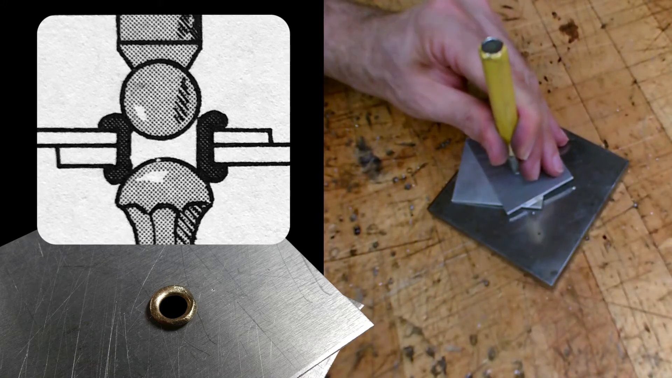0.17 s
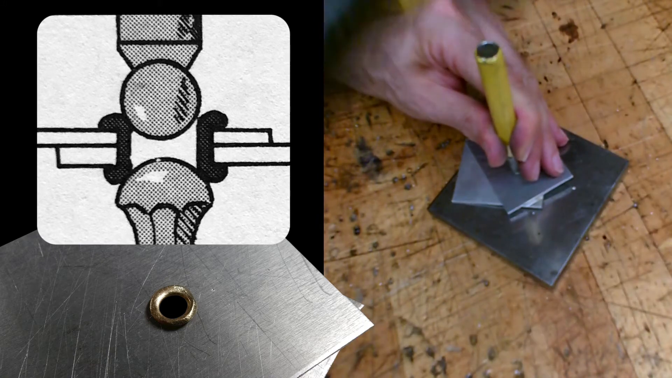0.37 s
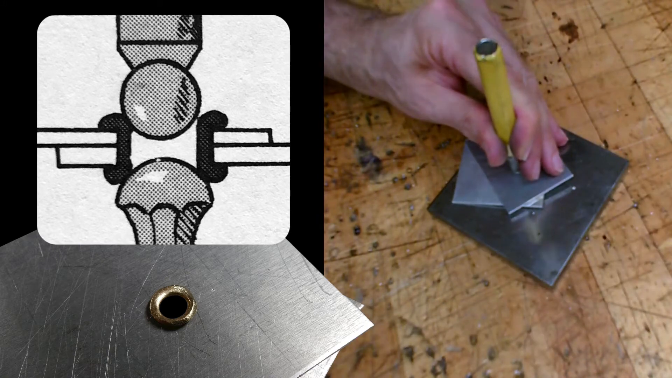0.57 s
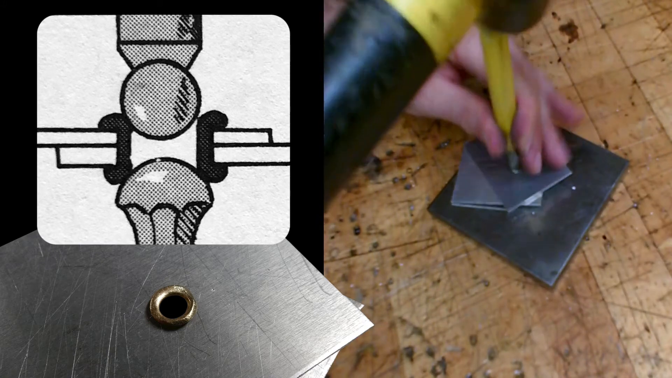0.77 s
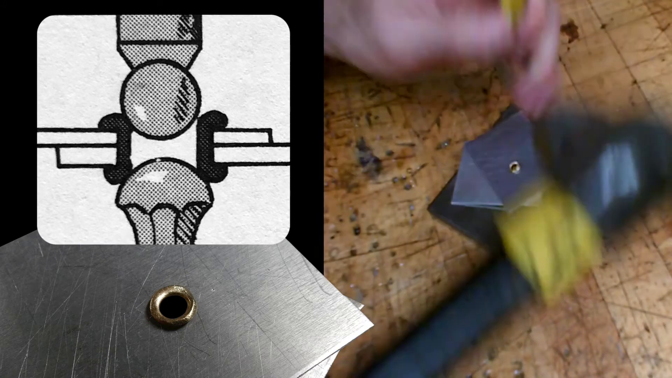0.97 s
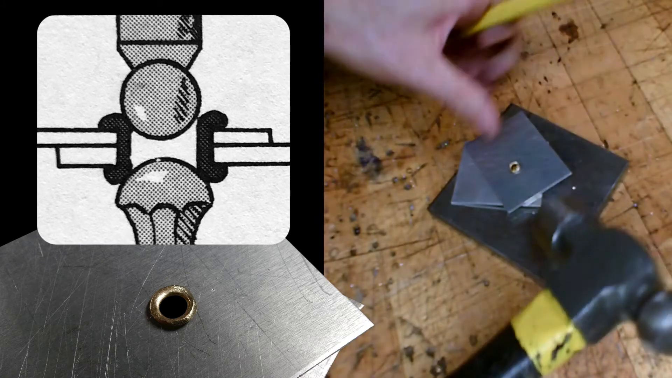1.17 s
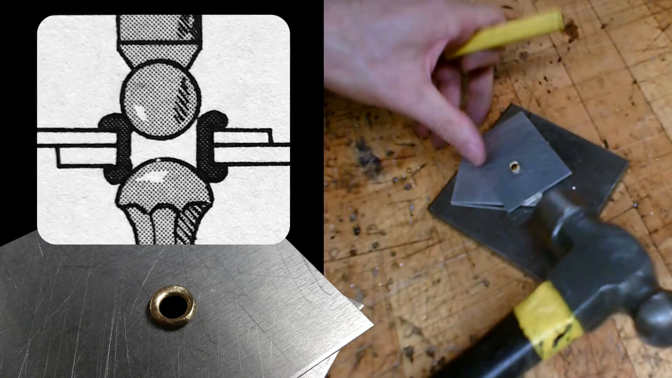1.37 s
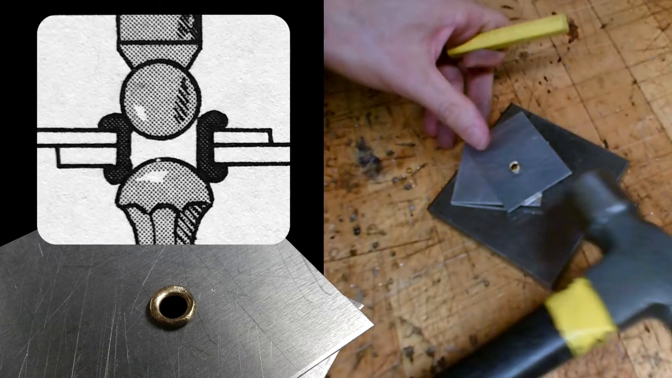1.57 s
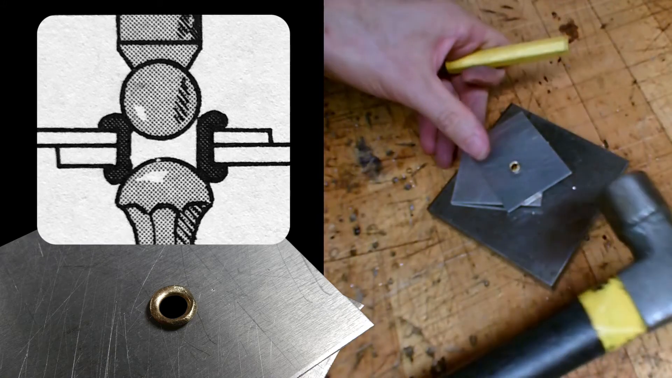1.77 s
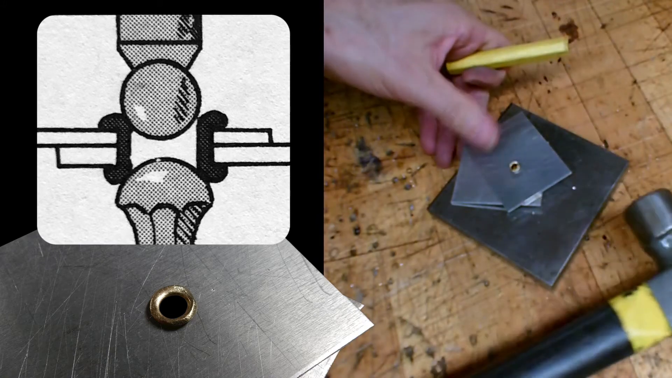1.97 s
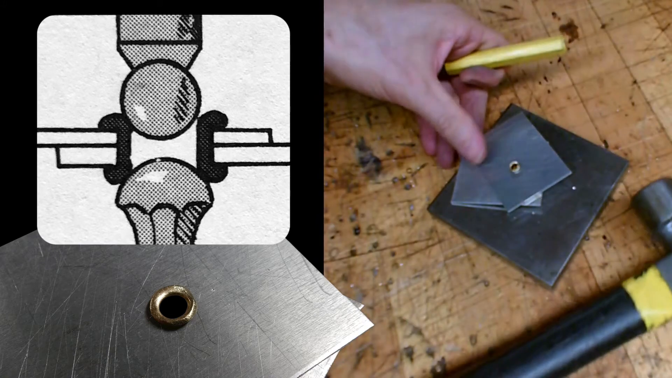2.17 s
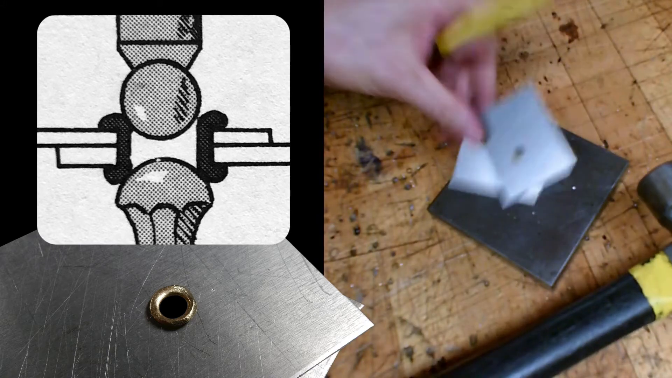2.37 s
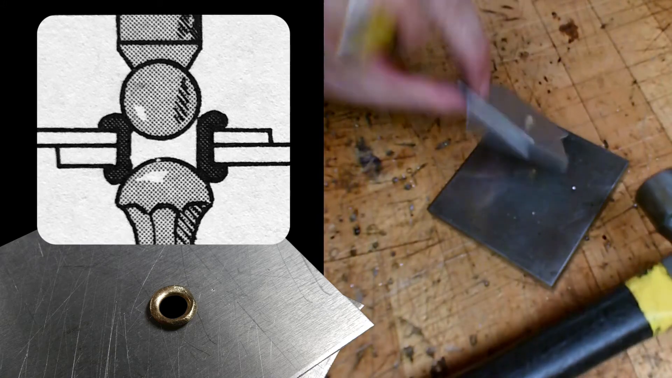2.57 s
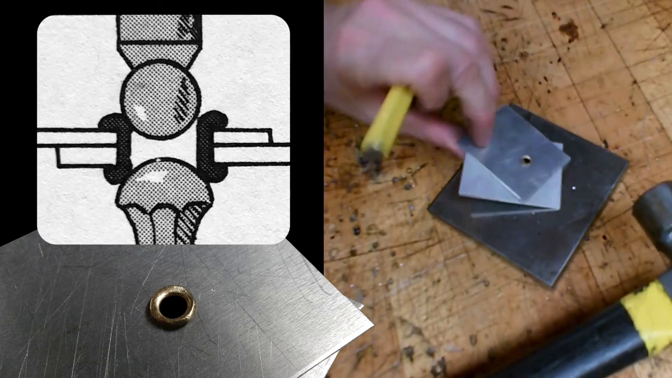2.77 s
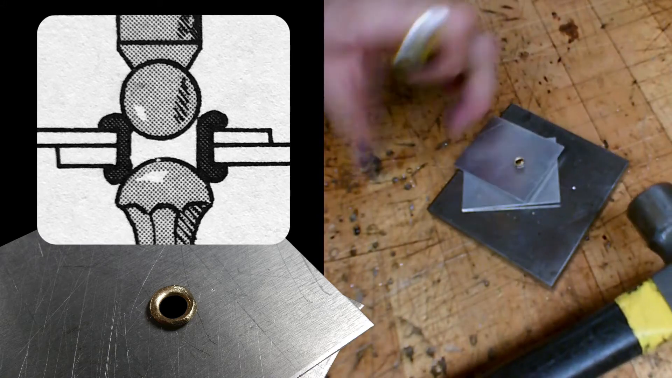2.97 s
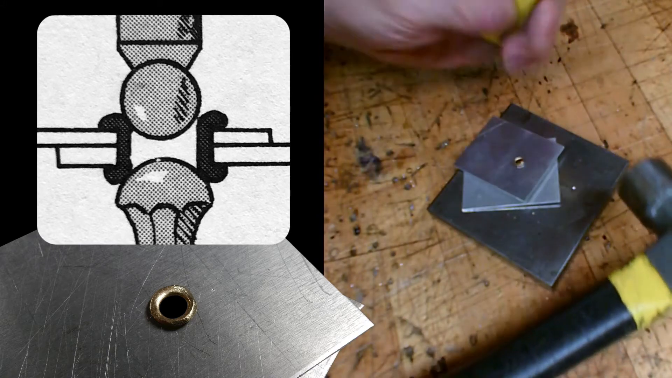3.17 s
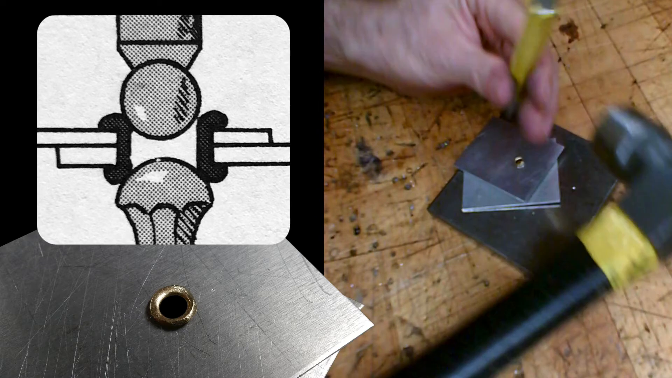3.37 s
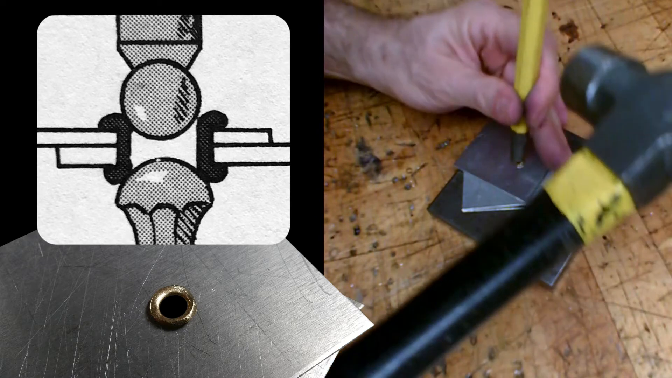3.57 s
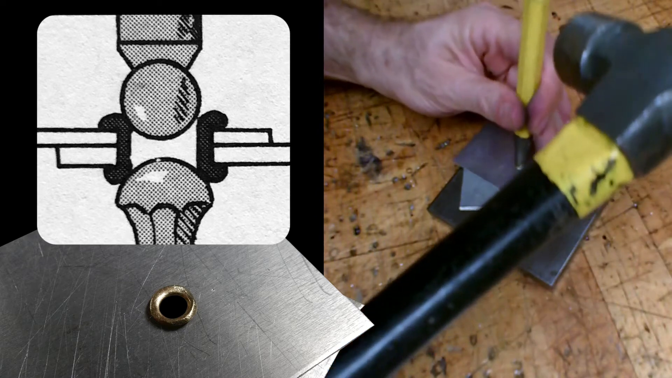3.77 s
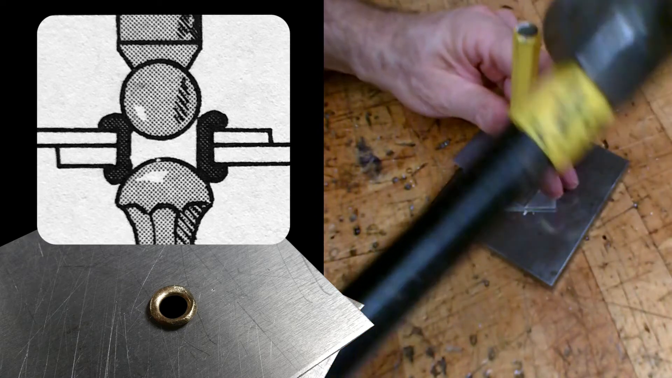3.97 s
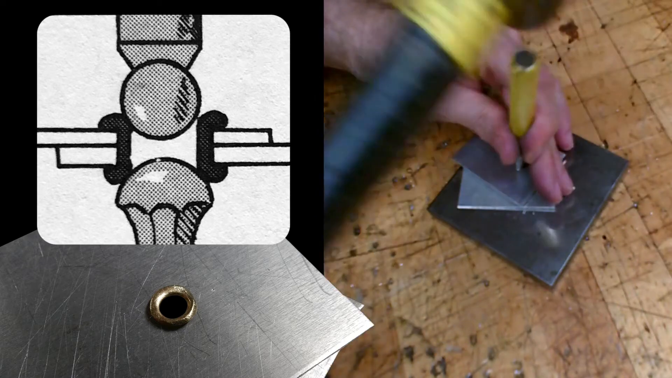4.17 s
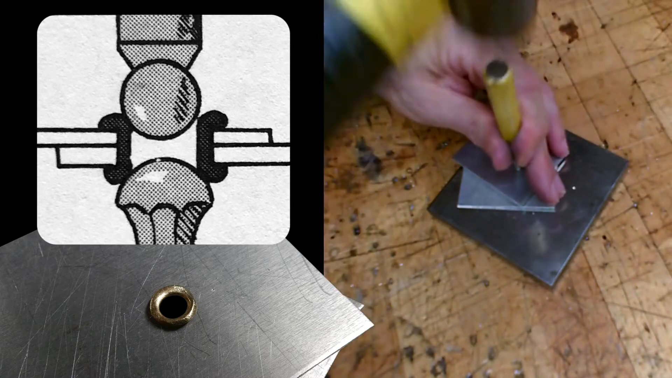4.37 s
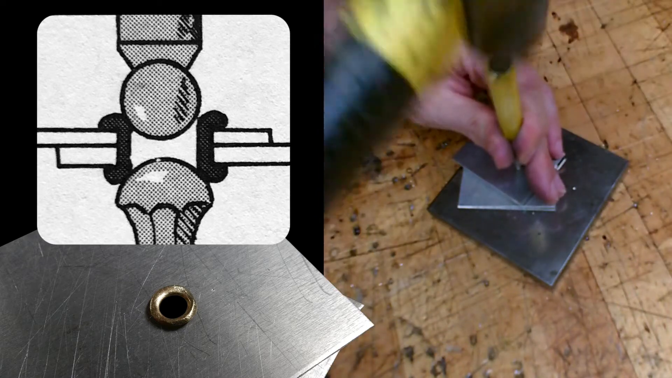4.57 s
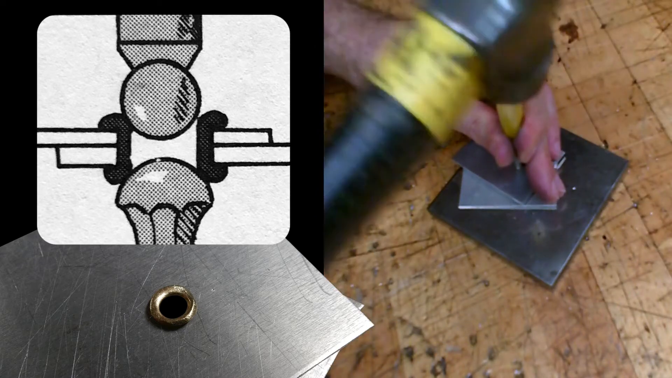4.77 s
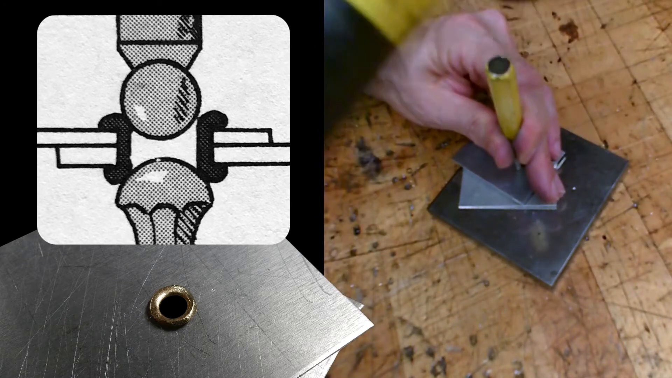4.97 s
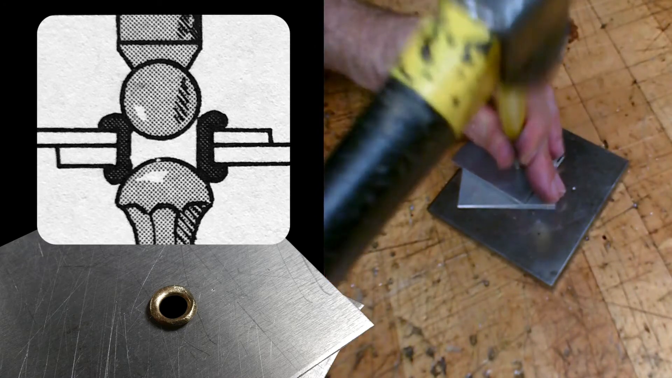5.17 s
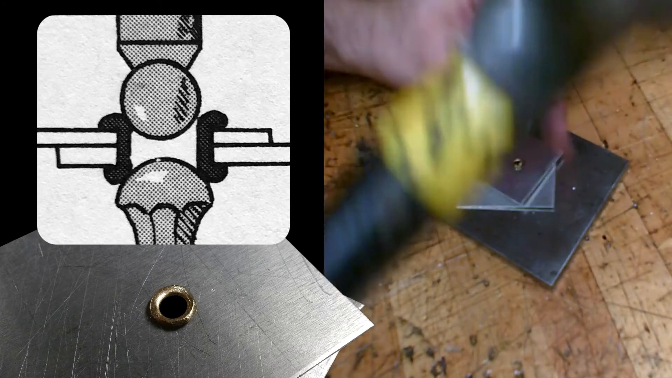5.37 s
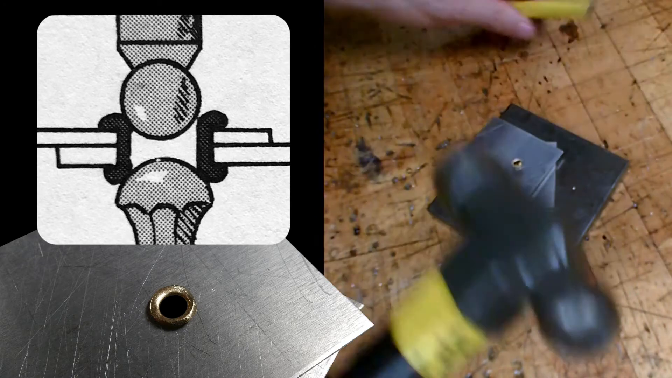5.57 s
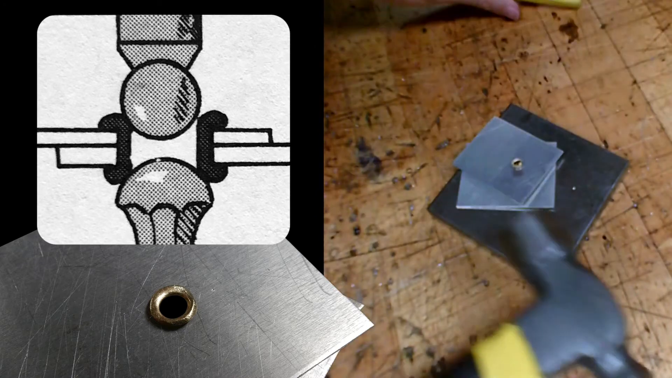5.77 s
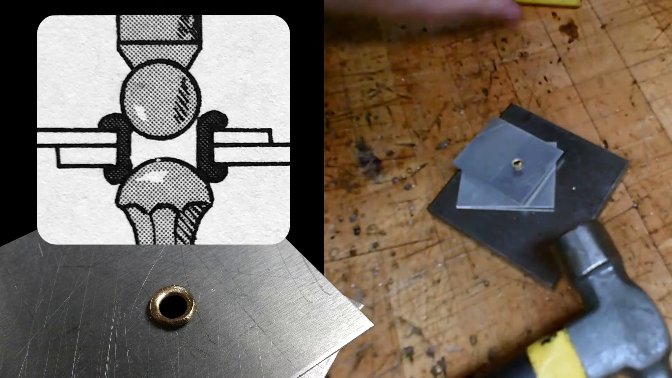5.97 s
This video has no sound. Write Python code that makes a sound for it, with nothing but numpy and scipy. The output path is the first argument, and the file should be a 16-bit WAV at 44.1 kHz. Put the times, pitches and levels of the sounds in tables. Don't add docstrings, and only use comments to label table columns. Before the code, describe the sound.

Hammer blows crack on a steel punch over thin metal plates in a live workshop, plates rattling and clinking, then the hammer set down.

```python
import sys
import numpy as np
from scipy import signal
from scipy.fft import rfft, irfft
from scipy.io import wavfile
from scipy.ndimage import uniform_filter1d

SR = 44100
rng = np.random.default_rng(int(sys.argv[2]) if len(sys.argv) > 2 else 0)


def digitize_waveform(pressure):
    field = np.atleast_2d(pressure).T
    bounded = np.clip(field, -1, 1)
    quanta = np.round(bounded * 32767).astype(np.int16)
    wavfile.write(sys.argv[1], SR, quanta)


def invert_db(x):
    u = np.asarray(x, float) / 20
    return 10 ** u


N = 265702

# pitch_hz, level_db, t60_s
TIP_MODES = [(3400, -0.5, 0.14), (3630, 9, 0.093), (4200, 4.5, 0.13), (4900, 5, 0.055), (6000, -4.5, 0.17),
             (7330, 3.5, 0.067), (7920, 10.5, 0.046), (10000, 0, 0.065), (11500, 3, 0.073),
             (12800, -2, 0.08), (13700, -16.5, .02)]


def evened(x):
    return x / np.sqrt(np.mean(x ** 2) + 1e-20)


def read(points, hz):
    f, value = np.transpose(points)
    return np.interp(np.log(hz + 1), np.log(f + 1), value)


def add(mix, s, sound):
    at = round(s * SR)
    sound = sound[max(-at, 0):]
    part = mix[max(at, 0):][:len(sound)]
    part += sound[:len(part)]


def returned(sound, returns):
    out = np.zeros(SR)
    for s, db in returns:
        add(out, s, invert_db(db) * sound)
    return out


def coloured(points, size):
    hz = np.fft.rfftfreq(size, 1 / SR)
    return evened(irfft(rfft(rng.standard_normal(size)) * invert_db(read(points, hz)), size))


def resonate(x, hz, width):
    turn = np.exp(2j * np.pi * np.cumsum(hz * np.ones(len(x))) / SR)
    r = np.exp(-np.pi * width / SR)
    return 2 * (turn * signal.lfilter([(1 - r) ** 2], [1, -2 * r, r * r], x / turn)).real


def ring(modes, length, detune=.0, scatter_db=.0, free=1.0, count=1):
    t = np.arange(round(length * SR)) / SR
    hz, db, t60 = np.repeat(np.transpose(modes), count, 1)[:, :, None]
    a, b, c = rng.uniform(-0.99, 1, (len(hz), 3)).T[:, :, None]
    fall = invert_db(db + scatter_db * b - 60 * t / (t60 * free))
    return (fall * np.sin(2 * np.pi * hz * (1 + detune * a) * t + 2.0 * c)).sum(0) / np.sqrt(count)


def padded(sound):
    return np.pad(sound, (0, SR - len(sound)))


def hammer_blows():
    # start_s, peak_db, bench_thud_db, steel_crack_db, punch_ring_db
    blows = [
        (0.216, 1, 4, -5, -14.5),
        (0.569, 3, 3, -3, -7.5),
        (4.4186, -9.5, 5.5, -6, -15.5),
        (4.737, -4, 8.5, -3, -5),
        (5.05, 0.5, 5, -5, -1.5),
    ]
    # peak_db, bench_thud_db, steel_crack_db, punch_ring_db
    earlier = (-3.5, 4.5, -7.5, -13)
    # pitch_hz, width_hz, level_db
    cracks = [
        [(3680, 330, -0.5), (4500, 340, -11), (6400, 210, -18), (7400, 210, -19), (8470, 250, -6),
         (9700, 190, -11.5), (9860, 160, -19.5), (11600, 400, -18.5)],
        [(2900, 210, -12), (3584, 190, 0.5), (4460, 200, -9), (5217, 620, -1.5), (7650, 240, -15),
         (9100, 230, -5), (10160, 400, -11), (11270, 440, -17.5)],
        [(3175, 500, 3), (3890, 190, 3), (4340, 160, -2), (6400, 410, -23), (7420, 410, -31),
         (8190, 250, -13.5), (9240, 260, 3.5), (11500, 440, -13.5)],
        [(3500, 400, -6), (3794, 250, -6.5), (4357, 420, -2.5), (5850, 300, -12.5), (7780, 330, -13.5),
         (8330, 240, -11), (9380, 280, -7.5), (11400, 530, -13), (11760, 240, -25.5)],
        [(3658, 400, -0.5), (4170, 500, 1), (5652, 310, -12), (6600, 300, -15), (8100, 260, -7.5),
         (9070, 190, -5), (10400, 170, -15), (11200, 250, -11.5)],
    ]
    out, thud, hall = np.zeros(N), bench(), rfft(echoes())
    struck = [(-.13, *earlier)] + list(blows)
    for (s, *strength), peaks in zip(struck, cracks[:1] + cracks):
        add(out, s + .0007, blow(thud, hall, peaks, *strength))
    return out


def blow(thud, hall, peaks, peak_db, thud_db, crack_db, ring_db):
    # pitch_hz, level_db, t60_s
    punch_modes = [(10440, -11, 0.12), (13660, -26, .14), (3810, -21, 0.3)]
    # pitch_hz, level_db, t60_s
    block_modes = [(9150, -50, 0.35)]
    # delay_s, level_db
    crack_returns = [(.0120, -17.5), (.0230, -24), (.0275, -23), (.0365, -21.5), (.0485, -27.5),
                     (.0585, -26)]
    t = np.arange(SR) / SR
    chatter = rng.standard_normal(SR) * (invert_db(-60 * t / 0.0091) + invert_db(-17.0 - 60 * t / 0.097))
    steel = resonate(chatter, 2900, 10000) * 1.18
    modes = [(f, db + 20 * np.log10(width / 200), 1.3 * 2.5 / width) for f, width, db in peaks]
    crack = ring(modes, .1, 0.032, count=3)
    add(steel, 0, crack)
    punch = padded(ring(punch_modes, .4, 0.011, 3, count=6))
    scatter_s = 0.0025
    scatter = rng.standard_normal(500) * np.exp(-t[:500] / scatter_s) / np.sqrt(scatter_s * SR)
    scattered = np.convolve(resonate(steel[:800], 4200, 5000), scatter)
    steel = steel + returned(scattered, crack_returns)
    block = padded(ring(block_modes, .4, 0.012, count=5))
    back = blow_in_room(hall, crack, thud_db, crack_db)
    direct = invert_db(crack_db + 8.0) * steel + invert_db(ring_db - 4.5) * punch + invert_db(thud_db - 10.0) * thud
    steel_rise_s = .0005
    direct = direct * (1 - np.exp(-(t / steel_rise_s) ** 2))
    return invert_db(peak_db) * (direct + back) + block


def blow_in_room(hall, crack, thud_db, crack_db):
    # pitch_hz, level_db_per_hz
    echo_colour = [(45, -12), (100, -6), (180, -12), (290, -5.5), (400, -7), (535, -1.5), (700, -9.5),
                   (990, -11), (1560, -13.5), (2300, -19), (3750, -18), (5500, -21), (9200, -32.5),
                   (15500, -35)]
    t, hz = np.arange(SR) / SR, np.fft.rfftfreq(SR, 1 / SR)
    steely = 1 / (1 + (2300 / (hz + 1)) ** 4)
    colour_db = read(echo_colour, hz) + thud_db + (crack_db - thud_db) * steely
    crack_echo = invert_db(crack_db + 5.5 - 16.0 - 0.94 * hz / 1000) * abs(rfft(crack, SR))
    back = irfft(hall * np.hypot(invert_db(colour_db + 33.0), crack_echo), SR)
    back = back * (1 - np.exp(-(t / 0.0071) ** 2)) * (t < .9)
    low = irfft(rfft(back) / (1 + (np.log2((hz + 1) / 420) / 0.53) ** 6), SR)
    diffuse_s, lack = .15, .75
    return back - lack * low * np.exp(-(t / diffuse_s) ** 4)


def bench():
    # pitch_hz, level_db, t60_s
    wood_modes = [(65.3, -11, 0.087), (114.3, -6.5, 0.16), (159.8, -4, 0.061), (251.7, -8.5, 0.068),
                  (294.4, -9.5, 0.078), (371.6, -7.5, 0.06), (449, -2, 0.087), (515, -10.5, 0.17),
                  (657, -5, 0.032), (791.4, -18.5, 0.046), (1001, -10, 0.11), (1251, -2.5, 0.04),
                  (1555, -0.5, 0.05), (2114, -6.5, 0.021)]
    # delay_s, level_db
    boom_returns = [(.0030, 4.5), (.0118, 1.5), (.0255, -16), (.0322, -4), (.0412, 0.5), (.0492, -16.5),
                    (.0570, -3.5), (.0650, -5), (.0760, -16), (.0815, -8.5), (.0895, -20), (.0972, -9),
                    (.1045, -13.5), (.1105, -25), (.1225, -21.5), (.1312, -11), (.1440, -27),
                    (.1550, -17.5)]
    # delay_s, level_db
    knock_returns = [(.0005, -1.5), (.0072, -7), (.0225, -10.5), (0.034, -11.5), (0.041, -9.5),
                     (0.056, -14.5), (.0640, -48), (.0705, -9), (.0790, -13), (.0860, -23), (.0920, -11),
                     (.1010, -18), (.1130, -17)]
    t = np.arange(SR) / SR

    def thump(hz, swell_s, db):
        u = t[:2000]
        return invert_db(db) * np.sin(2 * np.pi * hz * u) * u / swell_s * np.exp(1 - u / swell_s)

    boom, knock = thump(542, 0.0023, -5), thump(285, 0.0024, -2)
    rise_s = .0028
    thud = padded(ring(wood_modes, .3, .05, 0.6, count=6)) * (1 - np.exp(-(t / rise_s) ** 2))
    return thud + returned(boom, boom_returns) + returned(knock, knock_returns)


def clinks(events, modes, length, free, spread, fizz, focus_db):
    out = np.zeros(N)
    order = np.arange(16)
    for s, peak_db, bright_hz, rattle_ms in events:
        near = [(hz, db - focus_db * abs(np.log2(hz / bright_hz)), t60) for hz, db, t60 in modes]
        touches = np.zeros(900)
        jitter, size, side = rng.random((16, 3)).T
        u = (order + jitter) / 17
        size = size + .8 * (order == 0)
        force = np.sign(side - .5) * (.4 + size) * np.sin(np.pi * (0.17 + 0.93 * u))
        np.add.at(touches, (rattle_ms / 1000 * SR * u).astype(int), force)
        tick = evened(resonate(rng.standard_normal(599), bright_hz, .75 * bright_hz))
        tick = tick * 2.5 * invert_db(-60 * np.arange(599) / SR / .008)
        body = ring(near, length, spread, 2.5, free=free, count=5)
        add(body, 0, fizz * tick)
        sound = signal.oaconvolve(body, touches)
        add(out, s + 0.00031, invert_db(peak_db) * sound / abs(sound).max())
    return out


def rocking():
    # start_s, near_edge_db, far_edge_db
    swings = [(0.752, -33, -28), (0.866, -31, -30), (0.9732, -32, -29), (1.09, -33.5, -32.5),
              (1.2043, -36, -32), (1.3098, -36.5, -38.5), (1.3968, -39, -43), (1.4686, -39.5, -49),
              (1.5314, -52, -48), (1.5864, -53.5, -56), (1.6374, -59, -72)]
    # pitch_hz, level_db, t60_s
    modes = [(3550, 14.5, 0.058), (4460, 12, 0.016), (5500, 9, 0.051), (6130, 1.5, 0.044),
             (7500, 4.5, 0.075), (8500, -18, 0.022), (9900, -18, 0.02), (12830, -10, 0.018)]
    gaps_s = np.maximum(.0425 * .836 ** np.arange(len(swings)), .0115)
    taps = [(s, near_db, 7000, 4.3) for s, near_db, _ in swings]
    taps += [(s + gap, far_db, 5800, 4.3) for (s, _, far_db), gap in zip(swings, gaps_s)]
    return clinks(taps, modes, length=.08, free=0.3, spread=0.03, fizz=0.6, focus_db=9)


def hands_shift_plates():
    # start_s, peak_db, brightest_hz, rattle_ms
    touches = [(0.2538, -13.5, 8330, 4.2), (1.9603, -57, 4500, 2.8), (1.975, -61.5, 8500, 1.6),
               (2.0482, -45.5, 3200, 1.7), (2.1674, -36, 3500, 4), (2.1779, -26.5, 5250, 5.4),
               (2.1914, -26.5, 5200, 2.36), (2.2035, -41, 4870, 4), (2.2654, -40, 3300, 3.7),
               (2.2762, -33, 4900, 2), (2.289, -48, 4940, 2), (2.321, -27, 4950, 14.6),
               (2.3244, -31.5, 3070, 5.9), (2.3702, -45, 6500, 5), (2.3812, -40, 5400, 4.4),
               (2.392, -48, 5200, 6.3), (2.4105, -40, 6500, 3), (2.4364, -33.5, 6900, 1.03),
               (2.593, -45.5, 5030, 3.2), (2.6004, -17.5, 5940, 7.8), (2.6004, -29.5, 2340, 3.6),
               (2.612, -30, 5600, 4.1), (2.626, -31.5, 4500, 4.1), (2.638, -26, 5040, 7),
               (2.64, -40, 3070, 3.2), (2.6754, -27, 6500, 2), (2.685, -44, 6500, 2.5),
               (2.7427, -32.5, 5900, 7), (2.8115, -45, 5500, 5.4), (2.833, -44.5, 6400, 4.3),
               (2.8534, -38, 3930, 3.7)]
    # pitch_hz, level_db, t60_s
    modes = [(2350, 0, 0.03), (3070, 1.5, 0.072), (3355, -2.5, 0.08), (3950, -8.5, 0.037), (4950, -4, 0.11),
             (5310, 0.5, 0.059), (5470, -7, 0.06), (6400, 1, 0.04), (7430, 2, 0.046), (8500, -3, 0.034),
             (10960, -8, 0.045), (12200, -2.5, .04), (15000, -6, .03)]
    return clinks(touches, modes, length=.12, free=0.34, spread=0.048, fizz=0.54, focus_db=8.5)


def plates_fall():
    # start_s, peak_db, brightest_hz, rattle_ms
    landings = [
        (2.8715, -18, 8200, .8),
        (2.8915, -15, 8070, 2.2),
        (2.8929, -10.5, 10300, 1.0),
        (2.896, -19, 5060, 5),
        (2.9015, -14.5, 7500, 5),
        (2.908, -27, 4020, 9),
        (2.918, -35, 3400, 11.5),
        (2.93, -29, 7500, 9),
        (2.941, -32, 6000, 6.8),
    ]
    # pitch_hz, level_db, t60_s
    modes = [(2940, -1, 0.22), (3100, -7, 0.21), (3402, -7, 0.11), (3770, -1.5, 0.29), (3960, -4, 0.24),
             (4640, -5.5, 0.32), (5006, -14, 0.27), (5980, -10, 0.18), (6300, 0, 0.11), (6790, 1, 0.1),
             (7730, 5, 0.055), (8200, 1, 0.06), (10300, 1, 0.037), (12000, -6, 0.069)]
    return clinks(landings, modes, length=.25, free=0.56, spread=.017, fizz=0.91, focus_db=8.5)


def punch_is_set():
    # start_s, peak_db, brightest_hz, rattle_ms
    touches = [(3.6015, -32.5, 3650, 9.5), (3.6139, -39, 3500, 4.7), (3.6252, -28.5, 3740, 9),
               (3.6384, -38, 4100, 7.2), (3.696, -42, 7670, 2), (3.702, -37.5, 3680, 7.2),
               (3.7555, -36.5, 3630, 4.6), (3.7755, -48.5, 8000, 2), (3.7813, -27.5, 7860, 0.8),
               (3.7859, -31, 6850, 3), (3.7938, -47, 8050, 2), (3.8014, -35.5, 6000, 0.94),
               (3.8174, -50, 7000, 1.8), (3.8494, -54, 4200, 2.2), (4.0594, -50.5, 3810, 2.2),
               (4.1624, -63, 3520, 2), (4.2654, -83, 3760, 1.8), (5.2803, -27, 4600, 3.1),
               (5.2805, -41.5, 8000, 1.5), (5.2908, -30.5, 4780, 6), (5.2925, -42, 8000, 4),
               (5.2985, -39, 9000, 3.5), (5.3197, -48, 6000, 3)]
    return clinks(touches, TIP_MODES, length=.12, free=0.27, spread=0.035, fizz=1.0, focus_db=9)


def grit():
    # start_s, peak_db, brightest_hz, rattle_ms
    snaps = [
        (5.7014, -55, 8900, 0.84),
        (5.7069, -44.5, 7500, 2),
        (5.7234, -44, 7500, 1),
        (5.7663, -34, 5430, 2.3),
        (5.773, -35.5, 4270, 8.7),
        (5.7885, -45, 8000, 1.2),
        (5.7975, -30.5, 3500, 1),
        (5.804, -38, 3500, 1.2),
        (5.8945, -42, 6500, 1.24),
    ]
    return clinks(snaps, TIP_MODES, length=.03, free=0.1, spread=0.051, fizz=0.49, focus_db=18.5)


def thin_plates():
    # pitch_hz, level_db, t60_s
    freed_modes = [(5570, -25.5, 0.32), (5930, -35.5, 0.2), (6500, -33.5, .4), (3400, -40.5, 0.33),
                   (4200, -32.5, 0.51)]
    plates = rocking() + hands_shift_plates() + punch_is_set() + plates_fall() + grit()
    plates = signal.sosfilt(signal.butter(3, 2300, "high", fs=SR, output="sos"), plates)
    add(plates, .5708, ring(freed_modes, .6, .025, 2.5, count=8))
    return plates


def hammer_down():
    # start_s, peak_db, knock_hz, head_ring_db, damped_after_s
    knocks = [(5.739, -32.5, 1010, -21, 0.056), (5.746, -33.5, 1134, -60.5, .1),
              (5.777, -38.5, 1000, -60, 0.103), (5.785, -36.5, 960, -60, .1),
              (5.797, -27.5, 1480, -59, 0.1), (5.803, -39, 1800, -63.5, .1), (5.8945, -14, 2557, -21.5, .2),
              (5.903, -23, 1480, -30, .2), (5.921, -26, 1580, -51, .1), (5.941, -21, 1440, -58, .1),
              (5.968, -25.5, 1400, -60, .1), (5.994, -31, 1490, -60, .1)]
    # pitch_hz, level_db, t60_s
    head_modes = [(4436, 0, 1.17), (11380, -18, .7), (12500, -41, .5)]
    out = np.zeros(N)
    for s, peak_db, hz, ring_db, damped_s in knocks:
        wood_modes = [(hz, 0, .018), (0.36 * hz, -5, .025), (380, -10, .03), (2.45 * hz, -20, .008)]
        wood = ring(wood_modes, .1, 0.11, 0.93, count=2)
        add(out, s, invert_db(peak_db) * wood * (1 - np.exp(-np.arange(len(wood)) / 8.0)))
        stirred = [(f, db + 0.5 * (peak_db + 15.0) * (db < 0), t60) for f, db, t60 in head_modes]
        head = ring(stirred, .2, 0.0006)
        t = np.arange(len(head)) / SR
        damping = np.exp(-np.maximum(t - damped_s, 0) / .002)
        add(out, s, invert_db(peak_db + ring_db) * head * (1 - np.exp(-t / 0.00064)) * damping)
    return out


def hammer_drag():
    # time_s, level_db
    strength = [
        (5.9, -14.5),
        (5.911, -30),
        (6.02, -34),
    ]
    # pitch_hz, level_db_per_hz
    grind_colour = [(150, -10), (400, -2), (900, 8.5), (1500, 7), (3300, 1.5), (4000, -8.5), (6000, -25.5),
                    (11000, -33), (15000, -55)]
    out = np.zeros(N)
    s, db = np.transpose(strength)
    t = np.arange(s[0], s[-1] + 0.012, 1 / SR)
    grain = uniform_filter1d(uniform_filter1d(rng.standard_normal(len(t)), 130), 130)
    grind = evened(coloured(grind_colour, len(t)) * invert_db(1.8 * evened(grain)))
    add(out, s[0], invert_db(np.interp(t, s, db)) * grind * (1 - np.exp(-(t - s[0]) / 0.00057)))
    return out


def rubs(strokes, whistle, bend):
    out = np.zeros(N)
    for s, length, db, first_hz, last_hz in strokes:
        u = np.linspace(0, 1, round(length * SR))
        hz = first_hz * (last_hz / first_hz) ** (u ** bend)
        mean_hz = hz.mean()
        press = np.clip(np.minimum(u / 0.12, (1 - u) / 0.16), 0, 1) ** 2
        rough = evened(uniform_filter1d(rng.standard_normal(len(u)), 110))
        grains = rng.standard_normal(len(u)) * invert_db(0.48 * rough)
        wide = resonate(np.diff(grains, prepend=0), hz, 0.63 * mean_hz)
        wide = evened(resonate(wide, hz, 2.1 * mean_hz))
        fine = evened(np.diff(grains, 2, prepend=0, append=0))
        wide = wide + 0.34 * np.clip(hz / 8000, 0, 1) ** 2 * fine
        tone = evened(resonate(grains, hz, 0.076 * mean_hz))
        share = np.clip(whistle * (0.54 + u), 0, 1)
        add(out, s, invert_db(db) * (share * tone + (1 - share) * wide) * press)
    return out


def strokes_on_bench():
    # start_s, length_s, level_db, first_hz, last_hz
    slides = [
        (5.29, 0.092, -44, 1310, 1640),
        (5.81, 0.092, -49, 1950, 2420),
    ]
    # start_s, length_s, level_db, first_hz, last_hz
    brushes = [
        (2.33, .04, -61, 9000, 8500),
        (2.367, 0.036, -50, 6840, 5900),
        (2.402, .026, -58, 8500, 8000),
        (5.281, 0.026, -54, 8500, 9500),
    ]
    return rubs(slides, whistle=0.4, bend=0.29) + rubs(brushes, whistle=.1, bend=0.91)


def close_strokes():
    # start_s, length_s, level_db, first_hz, last_hz
    sweep = [
        (-.05, .175, -37, 7000, 3550),
    ]
    # start_s, length_s, level_db, first_hz, last_hz
    squeak = [
        (5.797, .016, -43, 1500, 1950),
    ]
    return rubs(sweep, whistle=.28, bend=.75) + rubs(squeak, whistle=.95, bend=.9)


def nudges():
    # start_s, peak_db, pitch_hz
    bumps = [
        (1.068, -32, 93),
        (1.158, -34, 89),
        (3.412, -40.5, 141),
        (4.682, -32, 111),
    ]
    out, t = np.zeros(N), np.arange(round(.06 * SR)) / SR
    for s, peak_db, hz in bumps:
        add(out, s, invert_db(peak_db) * np.sin(2 * np.pi * hz * t) * (t / 0.0084) * np.exp(1 - t / 0.0077))
    return out


def puffs():
    # peak_s, pressure_full_scales, half_width_s
    pushes = [(.925, -.03, .006), (1.064, -.07, .004), (1.077, .1, .006), (1.156, -.04, .004),
              (1.167, .07, .005), (5.41, -.15, .008), (5.451, -1.9, .0095), (5.4915, 3.4, .013),
              (5.527, -.34, .01), (5.5625, -1.5, .015), (5.596, -.2, .006), (5.623, .62, .012),
              (5.671, .4, .011), (5.705, -.16, .013), (5.738, .06, .006)]
    t = np.arange(N) / SR
    return sum(p * np.exp(-.5 * ((t - s) / w) ** 2) for s, p, w in pushes)


def draught():
    # time_s, level_db
    stir = [(0.0, -57), (0.2, -45), (0.95, -43.5), (1.2, -45), (1.3, -48.5), (1.7, -49), (2.8, -48.5),
            (4.3, -61), (5.199, -42.5), (5.35, -40), (5.75, -45), (6.02, -52.5)]
    s, db = np.transpose(stir)
    gust_size = round(0.06 * SR)
    gusts = evened(uniform_filter1d(uniform_filter1d(rng.standard_normal(N), gust_size), gust_size))
    level_db = np.interp(np.arange(N) / SR, s, db) + 4.5 + 6 * gusts
    return invert_db(level_db) * coloured([(8, -3.0), (20, 12.0), (45, -6.5), (90, -6.0), (200, -64.5)], N)


def ventilation():
    # pitch_hz, level_db_per_hz
    hiss_colour = [(12, -28.5), (20, 7), (154, -5.5), (228, -7), (262, -5), (319, -12.5), (357, -8),
                   (388, -11), (422, -9.5), (2390, -23), (4060, -32.5), (4540, -35), (10500, -55),
                   (11800, -50.5), (16000, -69.5)]
    # pitch_hz, rms_db
    hum_tones = [
        (201, -65),
        (358, -63),
    ]
    swell = invert_db(0.18 * evened(uniform_filter1d(rng.standard_normal(N), 5000)))
    hum = sum(invert_db(db) * evened(resonate(rng.standard_normal(N), hz, 7)) for hz, db in hum_tones)
    return invert_db(-42.5 - 5.5) * coloured(hiss_colour, N) * swell + hum


def echoes():
    # pitch_hz, t60_s
    decay = [(80, 0.37), (210, 0.59), (560, 0.66), (1470, 0.57), (3880, 0.65), (6000, 0.59), (9000, 0.47),
             (14000, 0.4)]
    taps = np.zeros(SR)
    at = np.arange(180, SR - 12, 12)
    taps[at + rng.integers(0, 12, len(at))] = rng.choice([-1., 1.], len(at))
    hz, t, z = signal.stft(taps, SR, nperseg=256)
    t60 = read(decay, hz)[:, None]
    z = z * invert_db(-60 * t / t60) / np.sqrt(t60)
    return signal.istft(z, SR, nperseg=256)[1][:SR] / np.sqrt(SR / 12 / np.log(1000000))


def room(x):
    # pitch_hz, level_db
    tail_colour = [(80, -2.5), (500, 1), (2000, -4.5), (4000, -4.5), (8000, -13), (15000, -9.5)]
    tail = irfft(rfft(echoes()) * invert_db(read(tail_colour, np.fft.rfftfreq(SR, 1 / SR))), SR)
    return signal.fftconvolve(x, tail)[:len(x)]


def scene():
    small = thin_plates() + hammer_down() + hammer_drag() + strokes_on_bench()
    near = hammer_blows() + small + close_strokes() + nudges()
    air = puffs() + draught() + ventilation()
    return (near + invert_db(-5) * room(small) + air)[None]


def low_pass(x):
    return signal.sosfilt(signal.butter(12, 17000, fs=SR, output="sos"), x)


def record(dry):
    held = np.clip(dry, -.82, .8)
    drain = np.exp(-1 / (.0027 * SR))
    drained = signal.lfilter([1, -1], [1, -drain], held)
    top_hz = [0, 11000, 15600, 15900, 16900, SR / 2]
    top = signal.firwin2(511, top_hz, invert_db([-0.5, -1.0, -3.0, -32.0, -74.0, -91.5]), fs=SR)
    wired = signal.oaconvolve(drained, top[None], "same")
    return low_pass(np.clip(wired, -.97, .97))


dry = scene()
out = record(dry)
digitize_waveform(out)
```